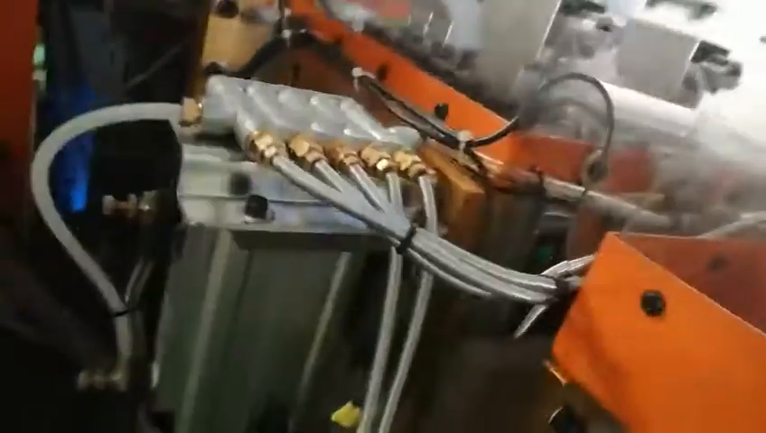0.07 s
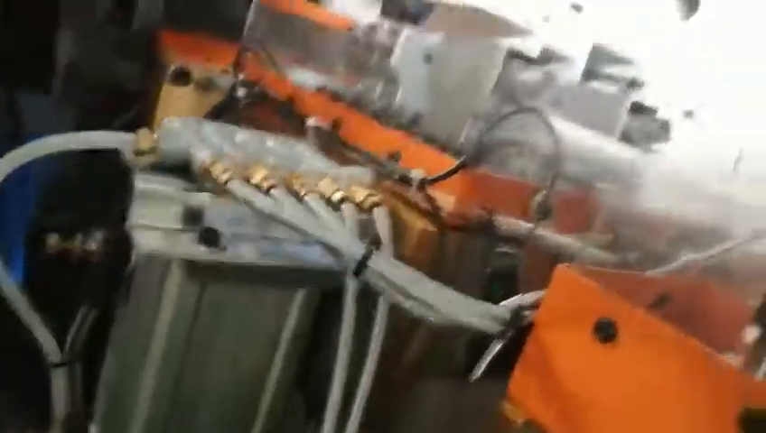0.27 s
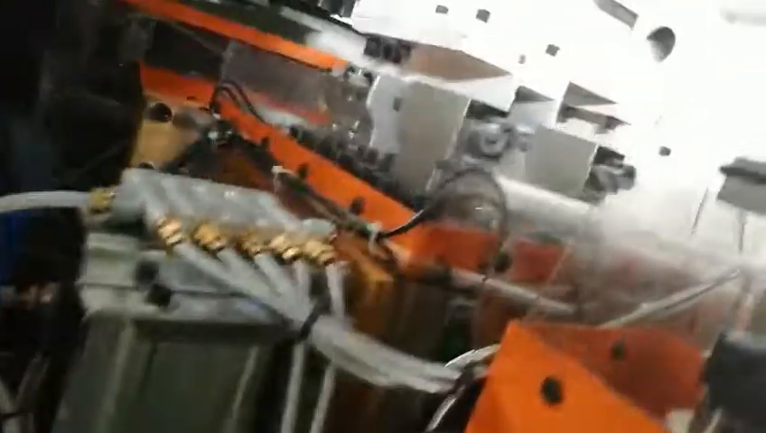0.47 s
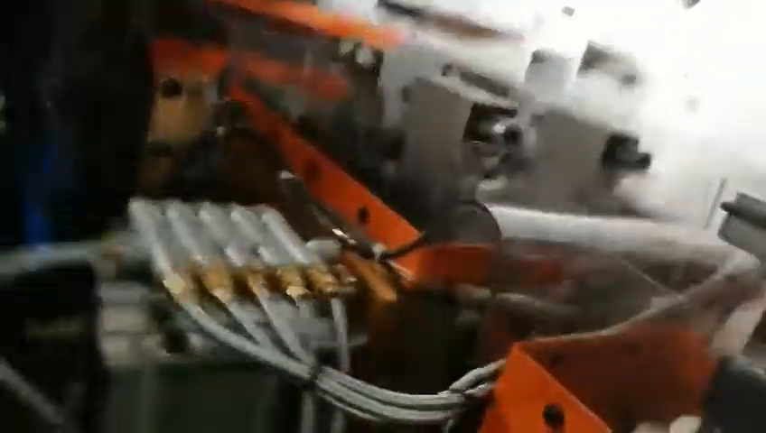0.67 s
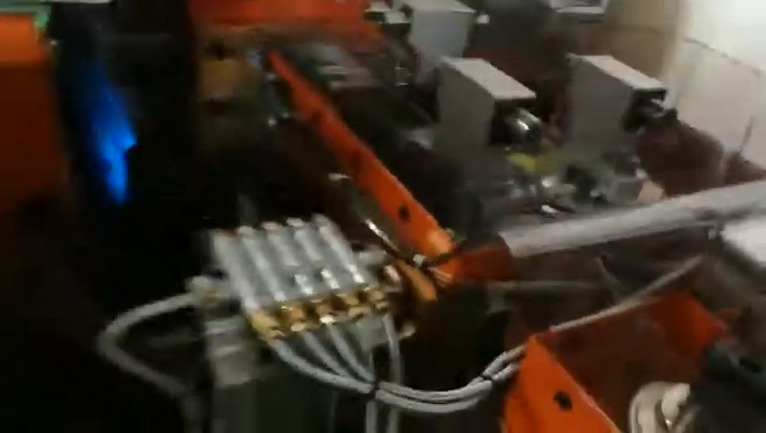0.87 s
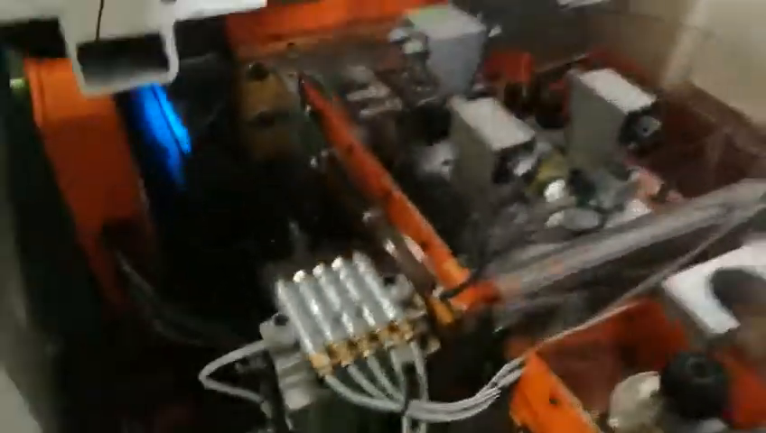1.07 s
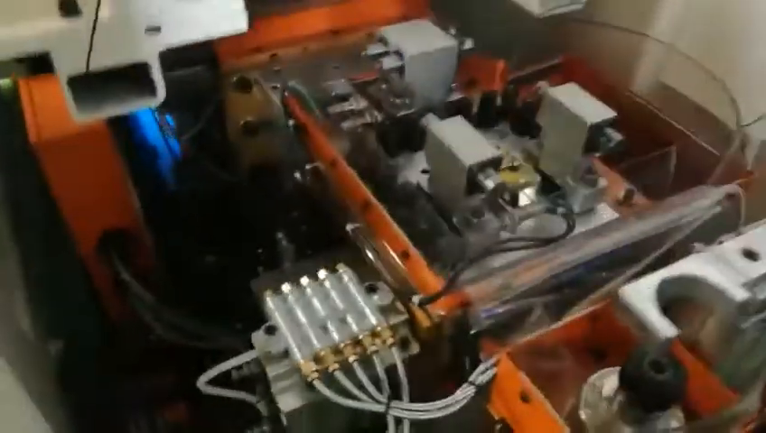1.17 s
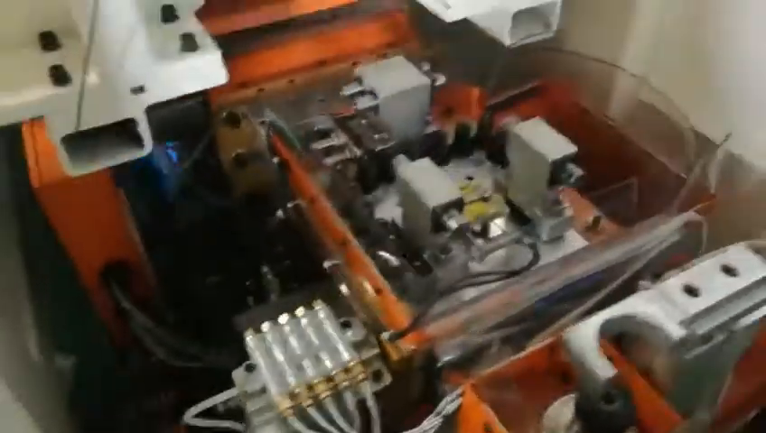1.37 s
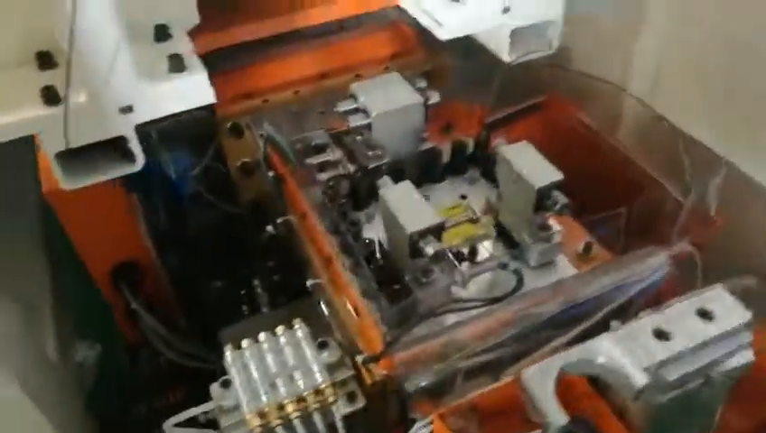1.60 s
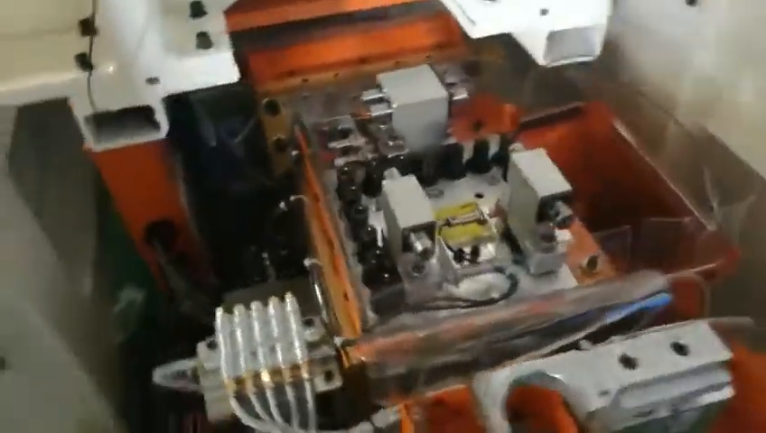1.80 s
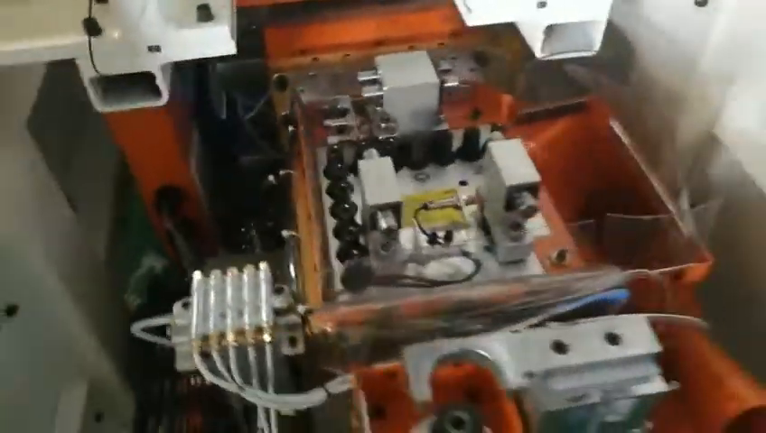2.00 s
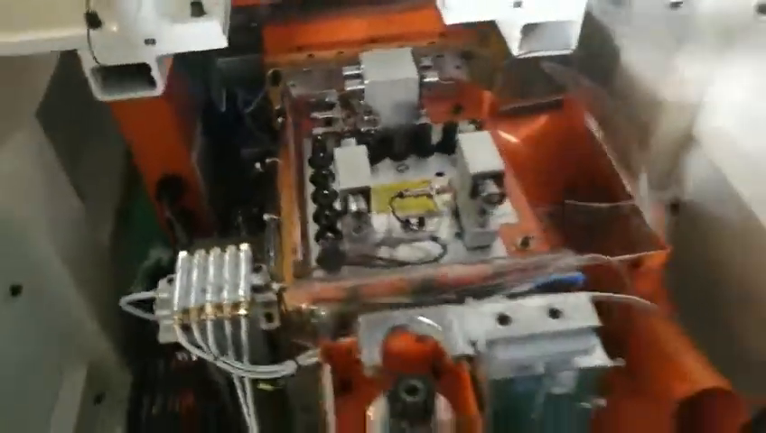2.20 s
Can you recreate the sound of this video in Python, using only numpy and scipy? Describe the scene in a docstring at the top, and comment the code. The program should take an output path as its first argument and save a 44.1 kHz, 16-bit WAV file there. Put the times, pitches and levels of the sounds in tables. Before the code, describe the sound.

Sharp double metal clack of a drilling machine's actuators: a rattling start, then a louder slam into a steel stop, with short cabinet ringing; fan hum and wavering whine continue, close microphone in a workshop.

```python
"""A drilling machine runs: noise gives its fans and travelling drive, wavering tones its spindle and low hum.
From 0.23 s its pneumatic actuators clack twice: a slide starts with a clatter, then slams into its stop at 0.41 s.
Bursts of noise make the rattle, fading tones the ringing frame and pinging steel parts, noise tails the cabinet.
The drive swells with the clacks, then dies away; the whine's octave comes and goes.
Near 1.9 s a faint puff of air follows, a brief swell of coloured noise."""
import sys
import numpy as np
from scipy import signal
from scipy.fft import rfft, irfft
from scipy.io import wavfile
from scipy.ndimage import uniform_filter1d

SR = 44100
rng = np.random.default_rng(int(sys.argv[2]) if len(sys.argv) > 2 else 0)


def wrap_up_sound(samples):
    """Save the sound to the file named by the first command line argument, as 16-bit audio."""
    columns = np.atleast_2d(samples).T
    # keep every value between -1 and 1, then stretch to whole-number steps
    tamed = np.clip(columns, -1, 1)
    steps = np.round(tamed * 32767).astype(np.int16)
    wavfile.write(sys.argv[1], SR, steps)


N = 99225  # length in samples, 2.25 s


def amp(db):
    """Turns decibels into gain."""
    return 10 ** (np.asarray(db) / 20)


def unit(x):
    """Scales a signal to rms 1."""
    return x / np.sqrt(np.mean(x ** 2) + 1e-20)


def read(points, hz, axis=1):
    """Reads one column of a table between its rows, on a log-frequency axis."""
    p = np.array(points, float)
    return np.interp(np.log(hz + 1), np.log(p[:, 0] + 1), p[:, axis])


def follow(points, t):
    """Reads a level in dB at the times t, in straight lines between the rows."""
    return np.interp(t, *np.transpose(points))


def add(mix, start_s, sound):
    """Mixes a sound in at its start time, cutting what runs past the end."""
    part = mix[..., round(start_s * SR):][..., :sound.shape[-1]]
    part += sound[..., :part.shape[-1]]


def colour(x, db_at, size=4096):
    """Filters noise with the gain db_at(Hz), never sounding before its input (minimum phase)."""
    hz = abs(np.fft.fftfreq(size, 1 / SR))
    log_gain = np.log(amp(db_at(hz)))
    response = np.exp(np.conj(signal.hilbert(log_gain)))
    taps = np.fft.ifft(response).real[:size // 2]
    return signal.fftconvolve(x, taps[None], axes=1)[:, :x.shape[1]]


def wander(rate_hz):
    """Slow random motion of rms 1: noise that weakens above rate_hz."""
    hz = np.fft.rfftfreq(N, 1 / SR)
    slow = rfft(rng.standard_normal(N)) / (1 + (hz / rate_hz) ** 2)
    return unit(irfft(slow, N))


PATCHY_DB = 0.5  # rms unevenness of the noise


def air(spectrum, size=1024):
    """Two channels of coloured noise of rms 1, with patches of time and pitch a little louder or softer."""
    overlap = size * 3 // 4
    z = signal.stft(rng.standard_normal((2, N)), SR, nperseg=size, noverlap=overlap)[2]
    patches = uniform_filter1d(rng.standard_normal(z.shape[1:]), size=12, axis=0)  # across pitch
    patches = unit(uniform_filter1d(patches, size=6, axis=1))  # across time
    x = signal.istft(z * amp(PATCHY_DB * patches), nperseg=size, noverlap=overlap)[1][:, :N]
    gain = amp(read(spectrum, np.fft.rfftfreq(N, 1 / SR)))
    return unit(irfft(rfft(x) * gain, N))


# Colour of the fans and workshop air. Each row: pitch in Hz, relative level in dB.
FAN_COLOUR = [(24, -3), (36, -2.5), (52, 3), (92, -10.5), (150, -7), (280, -8), (470, -14.5), (700, -6),
              (1200, -9.5), (1900, -8.5), (3000, 2.5), (3220, -2.5), (3400, -9.5), (5000, -16),
              (6800, -21.5), (8400, -20), (11000, -31.5), (16000, -44)]
FANS_DB = -44.5


def fans():
    """Turbulent air from the fans and the workshop: steady coloured noise."""
    return amp(FANS_DB) * air(FAN_COLOUR)


# Colour of the travelling drive. Each row: pitch in Hz, relative level in dB.
DRIVE_COLOUR = [(40, -3), (200, -5.5), (700, 3), (2000, -1.5), (3000, -0.5), (3700, -8), (10000, -18.5),
                (16000, -32.5)]
# Loudness of the travelling drive. Each row: time in seconds, level in dB.
DRIVE_LOUDNESS = [(0, -38.5), (.21, -39.5), (.45, -34), (.6, -46.5), (.8, -49), (1.1, -51.5)]


def drive():
    """The travelling drive's noise: coloured noise that swells, then dies away."""
    t = np.arange(N) / SR
    return amp(follow(DRIVE_LOUDNESS, t)) * air(DRIVE_COLOUR)


# Loudness of the whine's lowest tone. Each row: time in seconds, level in dB.
WHINE_LOUDNESS = [(.2, -41.5), (.45, -44), (.7, -52.5), (1.3, -62.5), (1.9, -53.5)]
# Loudness of its octave. Each row: time in seconds, level in dB.
OCTAVE_LOUDNESS = [(0, -45.5), (.86, -60.5), (.95, -50.5), (1.23, -49), (1.38, -54), (1.46, -70),
                   (1.56, -54), (1.65, -50.5), (1.76, -56.5), (1.8, -50), (1.83, -56), (1.97, -48),
                   (2.1, -54)]
# Faint motor and bearing tones. Each row: pitch in Hz, level in dB.
BEARING_TONES = [(145.3, -64.5), (5066, -71), (8010, -70.5), (8172, -74.5)]
WHINE_HZ, WAVER, WAVER_HZ = 798.6, 0.00075, 13.0  # WAVER: rms share of the pitch
SHIMMER_DB, SHIMMER_HZ = 1.7, 16  # random level changes: rms size and rate


def spindle():
    """A turning spindle: one unsteady speed wavers the whine, its octave and the bearing tones together."""
    t = np.arange(N) / SR
    clock = np.cumsum(1 + WAVER * wander(WAVER_HZ)) / SR
    whine = (WHINE_HZ, follow(WHINE_LOUDNESS, t))
    octave = (2 * WHINE_HZ, follow(OCTAVE_LOUDNESS, t))
    z = 0
    for hz, db in [whine, octave] + list(BEARING_TONES):
        z = z + amp(db + SHIMMER_DB * wander(SHIMMER_HZ)) * np.exp(2j * np.pi * hz * clock)
    return np.sqrt(2) * np.array([z.real, z.imag])  # sqrt(2) makes the levels rms


# Colour of a blow. Each row: pitch in Hz, gain in dB.
STRIKE_COLOUR = [(40, -23), (180, -6.5), (250, 1), (450, 8.5), (900, 15), (1800, 10.5), (2400, 5.5),
                 (3300, 9), (4300, 3.5), (5700, 3), (7000, 0), (9500, 2.5), (16000, -4)]
MID_HZ, TREBLE_HZ = 2060, 7460  # extra treble grows from none at MID_HZ to full at TREBLE_HZ
GRAIN_DB = 2.5  # rms roughness of the rattle


def rattle(t, level_db, treble_db, t60_s):
    """Many small metal contacts: grainy noise, coloured, that fades by 60 dB in t60_s before colouring."""
    roughness = unit(uniform_filter1d(rng.standard_normal(len(t)), size=16))
    grains = unit(rng.standard_normal((2, len(t))) * amp(GRAIN_DB * roughness))
    tilt = [(MID_HZ, 0), (TREBLE_HZ, treble_db)]
    fading = grains * amp(level_db - 60 * t / t60_s)
    return colour(fading, lambda hz: read(STRIKE_COLOUR, hz) + read(tilt, hz))


# Ringing tones of the machine frame. Each row: pitch in Hz, relative level in dB.
FRAME_TONES = [(385, -4), (440, -2.5), (511, -5.5), (640, -1), (738, 2.5), (795, 1.5), (944, -2),
               (987, 0.5), (1212, -4.5), (1275, -8.5), (1382, -2.5), (1876, -1.5)]
FRAME_T60_S, RING_SPREAD_OCT = 0.13, 0.6


def frame_ring(t, ring_db, ring_hz):
    """The frame's own tones fade together; the place of the blow decides which ring most."""
    ring = 0
    for hz, db in FRAME_TONES:
        nearness = np.exp(-.5 * (np.log2(hz / ring_hz) / RING_SPREAD_OCT) ** 2)
        tone = np.sin(2 * np.pi * (hz * t + rng.random((2, 1))))  # a random phase in each channel
        ring = ring + amp(ring_db + db - 60 * t / FRAME_T60_S) * nearness * tone
    return ring


# Blows of the actuators. Each row: start in seconds, rattle level in dB before colouring,
# its extra treble in dB, its 60 dB fading time in seconds, frame ringing in dB, pitch that rings most in Hz.
ACTUATOR_BLOWS = [(0.2324, -27.5, -5.5, 0.13, -30.5, 1440), (.24, -22.5, 0, 0.1, -29.5, 614),
                  (.26, -28, -10, 0.15, -26.5, 670), (.288, -27.5, -3.5, 0.15, -26, 800),
                  (.305, -26.5, -8, 0.072, -25, 440), (.347, -28.5, -8.5, 0.11, -48, 1100),
                  (.374, -40, 5, 0.27, -28.5, 805), (.3995, -27.5, 7, .14, -31.5, 800),
                  (.4048, -20, 3.5, 0.055, -28.5, 1150), (.413, -24, 7.5, 0.1, -25, 1740),
                  (0.4384, -19, -1, 0.033, -27, 870), (.462, -46, 13, .09, -36.5, 830),
                  (.492, -37.5, 10, 0.038, -33.5, 524), (.61, -47.5, 9.5, .12, -51, 1200)]
RISE_S = 0.0035


def add_blows(mix):
    """Each actuator blow shakes parts into a rattle and sets the frame ringing."""
    t = np.arange(SR // 2) / SR
    for start_s, level_db, treble_db, t60_s, ring_db, ring_hz in ACTUATOR_BLOWS:
        sound = rattle(t, level_db, treble_db, t60_s) + frame_ring(t, ring_db, ring_hz)
        add(mix, start_s, sound * np.minimum(t / RISE_S, 1))


# Fading of the cabinet. Each row: pitch in Hz, time to fade by 60 dB in seconds.
CABINET_FADE = [(500, 0.76), (2000, 0.29), (14000, 0.44)]


def cabinet(x, gap_s=0.006, size=256):
    """Diffuse reflections inside the cabinet: a noise tail, each band dying at its own speed."""
    hz, t, z = signal.stft(rng.standard_normal((2, SR)), SR, nperseg=size)
    fade = amp(-60 * t / read(CABINET_FADE, hz)[:, None])
    tail = signal.istft(z * fade, SR, nperseg=size)[1]
    tail = tail * np.minimum(np.arange(tail.shape[1]) / SR / gap_s, 1) ** 2  # reflections build up over gap_s
    return signal.fftconvolve(x, tail / np.linalg.norm(tail[0]), axes=1)[:, :N]


PING_RISE_S, PING_T60_S = 0.004, 0.085
PING_CHATTER_DB, PING_JITTER = 2.5, 0.007  # rms changes of level, and of pitch as a share


def ping(hz, db):
    """One brief mode of a steel part that chatters in level and pitch as it rings."""
    t = np.arange(SR // 4) / SR
    chatter, jitter = (unit(uniform_filter1d(rng.standard_normal(len(t)), size=90)) for _ in range(2))
    turns = np.cumsum(hz * (1 + PING_JITTER * jitter)) / SR + rng.random((2, 1))
    level = amp(db + PING_CHATTER_DB * chatter - 60 * t / PING_T60_S)
    return np.minimum(t / PING_RISE_S, 1) * level * np.sin(2 * np.pi * turns)


# Pings of small steel parts. Each row: start in seconds, pitch in Hz, level in dB.
PART_PINGS = [(.241, 9400, -29), (0.25, 12715, -22), (0.25, 8030, -27.5), (.25, 15130, -31),
              (0.27, 5900, -29.5), (.271, 13370, -28.5), (.3745, 3370, -21), (.468, 8780, -29),
              (.466, 10200, -31), (0.46, 8270, -29), (0.45, 12850, -30), (.425, 14000, -28),
              (0.61, 13500, -38)]


def add_small_parts(mix):
    """Small steel parts ping, some together, some apart."""
    for start_s, hz, db in PART_PINGS:
        add(mix, start_s, ping(hz, db))


# Hard metal-to-metal strikes within the blows. Each row: start in seconds, level in dB.
HARD_STRIKES = [(.2412, -24), (0.2588, -26), (.297, -23), (0.4082, -11), (0.4188, -23.5), (0.4424, -14.5)]
CONTACT_T60_S = 0.012


def add_contacts(mix):
    """Hard strikes of steel on steel: coloured noise, gone within milliseconds."""
    t = np.arange(SR // 2) / SR
    for start_s, db in HARD_STRIKES:
        crack = colour(rng.standard_normal((2, len(t))), lambda hz: read(STRIKE_COLOUR, hz))
        add(mix, start_s, unit(crack) * amp(db - 60 * t / CONTACT_T60_S))


THUMP_S, THUMP_HZ, THUMP_DB = 0.409, 284.5, -20
THUMP_SWELL_S, THUMP_FADE_S = 0.0086, 0.0037


def thump():
    """A low panel resonance swells and fades as the slide reaches its stop."""
    t = np.arange(N) / SR - THUMP_S
    shape = np.exp(-abs(t) / np.where(t < 0, THUMP_SWELL_S, THUMP_FADE_S))
    turn = 2 * np.pi * THUMP_HZ * t
    return amp(THUMP_DB) * shape * np.array([np.cos(turn), np.sin(turn)])


# Ringing tones of the steel end stop. Each row: pitch in Hz, level in dB.
STOP_TONES = [(990, -24.5), (1674, -19.5), (5749, -22), (8441, -24), (10120, -26.5)]
SLAM_S = 0.406


def add_end_stop(mix):
    """The slide slams into its steel stop, and all the stop's modes start at once."""
    for hz, db in STOP_TONES:
        add(mix, SLAM_S, ping(hz, db))


BLOWS_WET_DB, PING_WET_DB = -12, -22  # how much of each goes into the cabinet's reflections


def clacks():
    """All impacts, heard directly and, apart from the thump, through the cabinet's reflections."""
    blows, pings = np.zeros((2, 2, N))
    add_blows(blows)
    add_small_parts(pings)
    add_contacts(blows)
    add_end_stop(pings)
    reflections = cabinet(amp(BLOWS_WET_DB) * blows + amp(PING_WET_DB) * pings)
    return blows + pings + thump() + reflections


# Colour of the air puff. Each row: pitch in Hz, relative level in dB.
PUFF_COLOUR = [(200, -50), (1200, 5.5), (2500, 2), (15000, -17)]
PUFF_S, PUFF_WIDTH_S, PUFF_DB = 1.877, 0.059, -47  # time of its peak, width, level at its peak


def puff():
    """A soft puff of air: coloured noise under a bell-shaped swell."""
    t = np.arange(N) / SR
    swell = np.exp(-.5 * ((t - PUFF_S) / PUFF_WIDTH_S) ** 2)
    return amp(PUFF_DB) * swell * air(PUFF_COLOUR)


def hum():
    """The running machine: fans, travelling drive, spindle and one puff of air."""
    return fans() + drive() + spindle() + puff()


# Right port of the microphone. Each row: pitch in Hz, level against the left in dB for the clacks,
# the same in dB for the hum, likeness to the left from 0 to 1.
RIGHT_PORT = [(106, 5.5, -0.5, 1), (324, -3, -2, 0.97), (770, -7, -10.5, 0.83), (866, -3, -10.5, 0.23),
              (3400, -3, -11.5, 0.099), (4860, -14, -22.5, 0.52), (6000, -12.5, -17, 0.32),
              (7640, -23.5, -28, 0.24), (16000, -25, -22, .25)]
PORT_DELAY_S = 0.00058


def ports(x, axis):
    """The right port is shaded and hears a later, partly unrelated version of the left."""
    hz = np.fft.rfftfreq(2 * N, 1 / SR)
    left, other = rfft(x, 2 * N)
    same = np.clip(read(RIGHT_PORT, hz, axis=3), 0, 1)
    later = left * np.exp(-2j * np.pi * hz * PORT_DELAY_S)
    right = same * later + np.sqrt(1 - same ** 2) * other
    right = right * amp(read(RIGHT_PORT, hz, axis=axis))
    return np.array([x[0], irfft(right)[:N]])


def scene():
    """Clacks over the running machine."""
    return ports(hum(), axis=2) + ports(clacks(), axis=1)


EDGE_HZ = 15850


def record(dry):
    """The recorder's band limit: a steep filter removes what lies above EDGE_HZ."""
    low_pass = signal.firwin(1023, EDGE_HZ, window=("kaiser", 9), fs=SR)
    return signal.oaconvolve(dry, low_pass[None], "same")


dry = scene()
out = record(dry)
wrap_up_sound(out)
```